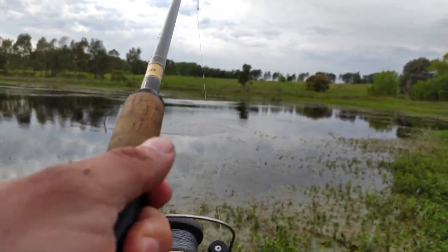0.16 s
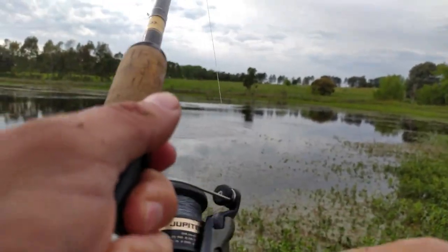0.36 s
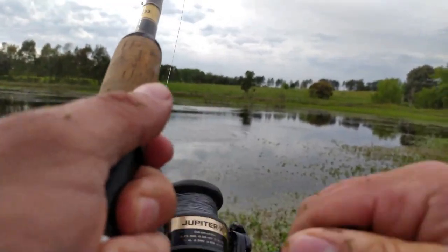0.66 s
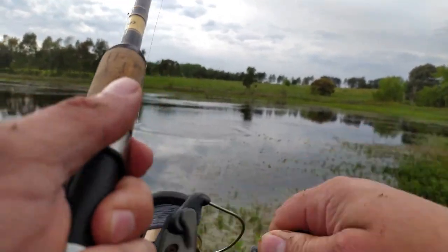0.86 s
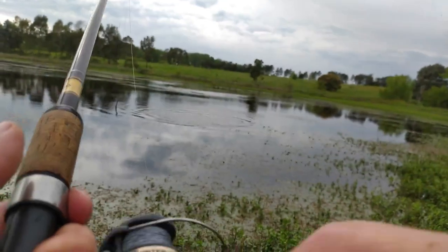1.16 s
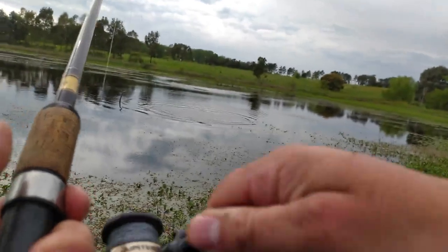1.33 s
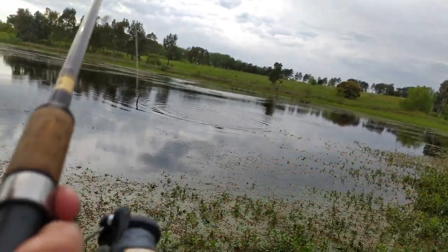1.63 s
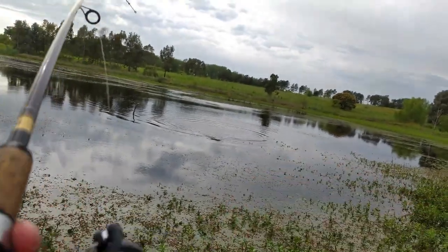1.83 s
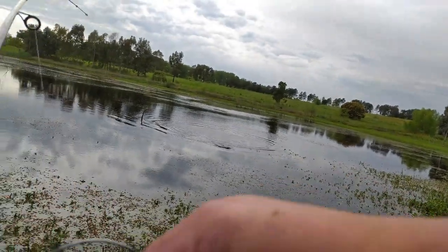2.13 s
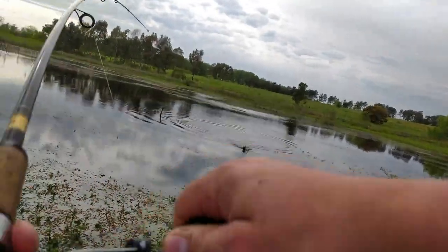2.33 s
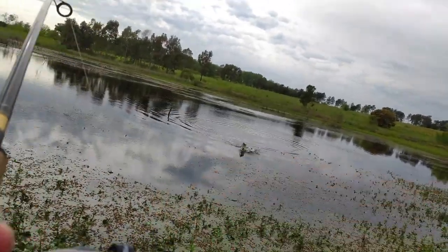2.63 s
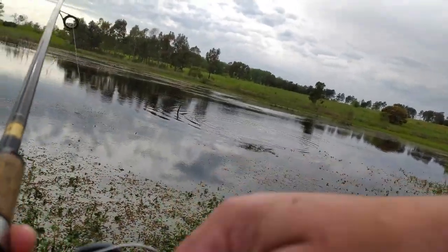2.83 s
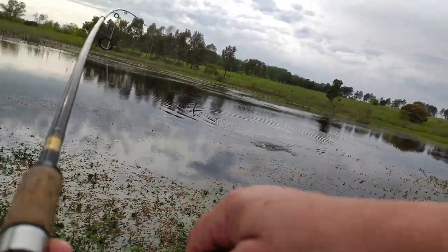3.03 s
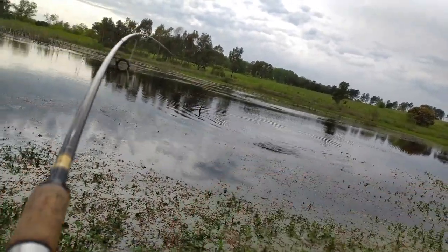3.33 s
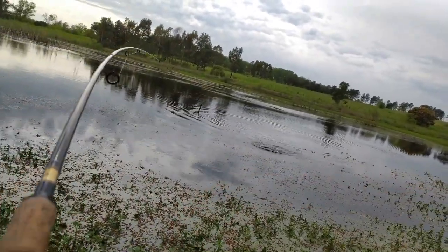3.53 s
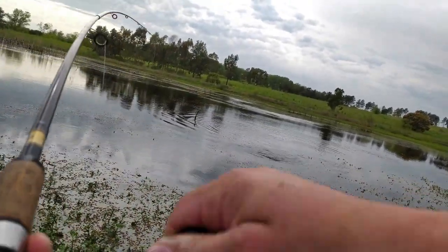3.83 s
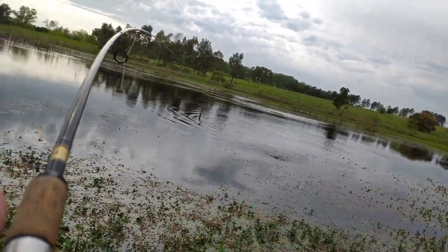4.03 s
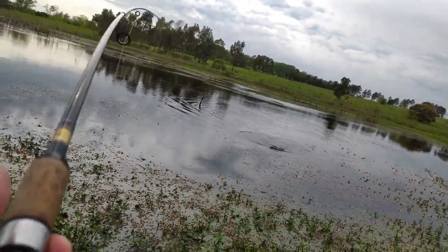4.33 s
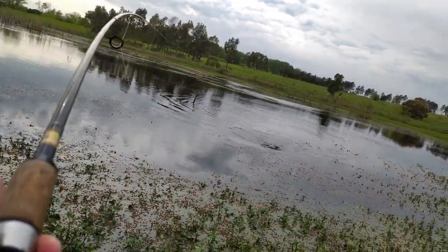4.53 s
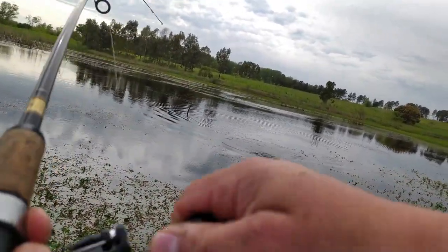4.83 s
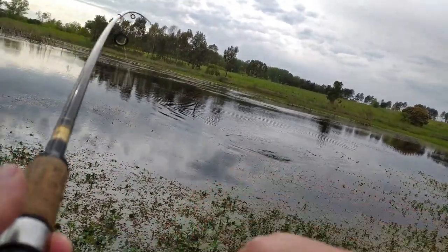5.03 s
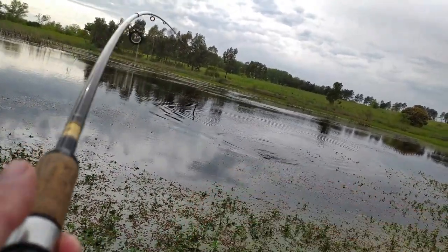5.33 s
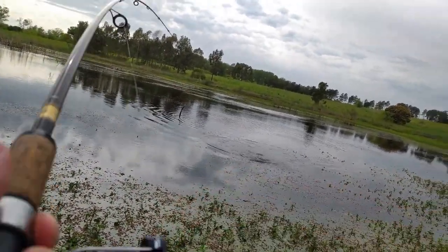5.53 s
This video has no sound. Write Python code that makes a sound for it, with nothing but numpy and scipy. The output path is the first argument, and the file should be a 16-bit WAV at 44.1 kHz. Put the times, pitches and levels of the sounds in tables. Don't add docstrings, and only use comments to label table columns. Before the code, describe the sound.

Very close to a stereo microphone beside a pond, a spinning reel starts with a short run of clicks, slows to sparse ticks, then is cranked in fast uneven bursts with a gritty rub and gear whirr. Low wind buffets thump on the left, strongest in the first second and a half, then fade. A few faint plops come from the water, over soft hiss.

```python
import sys
import numpy as np
from scipy import signal
from scipy.fft import rfft, irfft, next_fast_len
from scipy.io import wavfile
from scipy.ndimage import uniform_filter1d

SR = 44100
rng = np.random.default_rng(int(sys.argv[2]) if len(sys.argv) > 2 else 0)


def rack_gain(trim_db):
    fader = np.asarray(trim_db, float)
    return 10 ** (fader / 20)


def generate_wav(sig):
    pcm = np.round(np.clip(np.atleast_2d(sig).T, -1, 1) * 32767).astype(np.int16)
    wavfile.write(sys.argv[1], SR, pcm)


N = 250929
TIME = np.arange(N) / SR
PORT_LAG = 11


def rms_one(x):
    return x / np.sqrt(np.mean(x ** 2) + 1e-20)


def drift(rate):
    r = np.exp(-40 * np.pi * rate / SR)
    noise = rng.standard_normal(N // 20 + 4002)
    slow = signal.lfilter([1], [1, -2 * r, r * r], noise)[4000:]
    return np.interp(np.arange(N) / 20, np.arange(len(slow)), rms_one(slow))


def coloured(x, spectrum):
    hz, level_db = np.transpose(spectrum)
    size = next_fast_len(N)
    grid = np.log(np.arange(size // 2 + 1) * SR / size + 1)
    shape_db = np.interp(grid, np.log(hz), level_db)
    return rms_one(irfft(rfft(x, size) * rack_gain(shape_db), size)[..., :N])


def band(x, order, low_hz, high_hz):
    return signal.sosfilt(signal.butter(order, [low_hz, high_hz], "band", fs=SR, output="sos"), x)


def ring(x, hz, r):
    w = 2 * np.pi * hz / SR
    return signal.lfilter([0, np.sin(w)], [1, -2 * r * np.cos(w), r * r], x + 1e-18)


def at_ports(shared, own, alike):
    alike = np.clip(alike, 0, 1)
    common = np.array([np.roll(shared, PORT_LAG), shared])
    return np.sqrt(alike) * common + np.sqrt(1 - alike) * own


def lean(left_minus_right_db):
    return rack_gain(np.array([left_minus_right_db, -left_minus_right_db]) / 2)


# first tooth in seconds, number of teeth, first gap in ms, last gap in ms.
STROKES = [(0.0102, 7, 24.6, 36.6), (0.1746, 3, 53.9, 183.0), (0.428, 3, 478.0, 102.0),
           (0.7777, 18, 27.8, 15.5), (1.0449, 19, 17.0, 26.0), (1.3463, 16, 26.4, 22.7),
           (1.6197, 14, 27.0, 29.0), (1.9035, 4, 27.6, 54.3), (2.0342, 2, 115.7, 59.0),
           (2.2089, 11, 26.4, 14.6), (2.3945, 10, 11.6, 16.6), (2.549, 13, 31.4, 18.0),
           (2.765, 6, 30.8, 46.3), (2.9108, 3, 68.8, 18.8), (3.031, 13, 21.1, 19.2), (3.2319, 3, 5.8, 17.8),
           (3.3569, 6, 25.6, 15.3), (3.4567, 11, 12.6, 29.4), (3.6801, 3, 50.3, 24.3),
           (3.8071, 15, 23.6, 14.5), (4.0619, 3, 7.1, 107.2), (4.2267, 12, 22.4, 34.0),
           (4.4388, 3, 94.2, 44.3), (4.5871, 5, 25.8, 39.2), (4.7323, 7, 36.9, 18.2),
           (4.9118, 5, 15.7, 17.6), (5.0678, 8, 19.3, 16.3), (5.1863, 5, 16.0, 15.9),
           (5.3264, 8, 19.2, 21.0), (5.5113, 5, 16.9, 49.4)]
# snap in dB, lateness as a share of a gap, left minus right in dB.
WHEEL = [(-2.2, -0.013, -1), (-1.2, -0.062, 0), (0.5, -0.041, 0), (-0.6, 0.013, 4), (0.2, 0.015, 1),
         (2.8, 0.016, -3), (0.8, 0.011, 1.5), (-0.4, 0.012, -2), (-1.1, 0.032, 2), (-0.4, 0.017, 0)]


def teeth():
    start, count, first_ms, last_ms = np.transpose(STROKES)
    stroke = np.repeat(np.arange(len(start)), count.astype(int))
    u = np.concatenate([np.arange(n) / n for n in count])
    end = np.r_[start[1:], 5.7]
    ease = u * u * (3 - 2 * u)
    paces_ms = first_ms[stroke] * u * (1 - u) ** 2 - last_ms[stroke] * u * u * (1 - u)
    s = start[stroke] + (end - start)[stroke] * ease + count[stroke] * paces_ms / 1000
    late = np.resize(np.transpose(WHEEL)[1], len(s))
    return s + late * np.minimum(np.gradient(s), .03)


def speed_db(s, smooth_s):
    pace_db = 20 * np.log10(1 / 50 / np.diff(s))
    rate = np.interp(TIME, (s[1:] + s[:-1]) / 2, pace_db)
    return uniform_filter1d(rate, int(smooth_s * SR))


# pitch in Hz, level in dB, time to fall 60 dB in seconds.
PAWL = [(4900, -40, .004), (5105, -6, 0.0025), (5780, -0.5, 0.0019), (7290, -1.5, 0.0033),
        (8150, -1.5, 0.0036), (8950, -2, 0.0057), (9480, -1, 0.0038), (12000, -36, .003),
        (12400, -7, 0.001), (14300, -44, .003), (15300, -38, 0.0041)]


def pawl(s, peak_db, gain_db, chatter_s, catch_at, catch_spread_db, alike):
    luck = rng.standard_normal((len(s), 2))
    gap = np.diff(s, prepend=-.01)
    slow_loss_db = 10 * np.log10(np.maximum(gap * 50, 1))
    catch_db = -11 + catch_spread_db * np.minimum(luck[:, 1], 1) - slow_loss_db
    s = np.r_[s, s - gap * (catch_at + .07 * luck[:, 0])]
    peak_db = np.r_[peak_db, peak_db + catch_db] + gain_db

    tightness = rack_gain(1.8 * rng.standard_normal((len(s), 1)))
    spread = rng.standard_normal((len(s), 14)) * tightness
    at = np.clip(((s[:, None] + chatter_s * spread - .0003) * SR).astype(int), 0, N - 1)
    out = np.zeros((2, N))
    for hz, level_db, t60 in PAWL:
        clicks = np.zeros((3, N))
        dull_db = -24 * max(np.log2(hz / 7000), 0)
        colour_db = np.repeat([0., dull_db], len(s) // 2)
        colour_db += 4 * rng.standard_normal(len(s))
        height = rack_gain(peak_db + level_db + colour_db)[:, None]
        for part in clicks:
            sizes = rng.standard_normal(at.shape) * np.exp(-.75 * np.abs(spread))
            sizes = sizes / np.linalg.norm(sizes, axis=1, keepdims=True)
            np.add.at(part, at, sizes * height)
        out += ring(at_ports(clicks[0], clicks[1:], alike), hz, rack_gain(-60 / (t60 * SR)))
    return signal.sosfilt(signal.butter(4, 3900, "high", fs=SR, output="sos"), out)


def snaps(s, speed, load_db):
    tooth_db, _, facing_db = (np.resize(column, len(s)) for column in np.transpose(WHEEL))
    effort_db = (0.17 * speed + 0.33 * load_db)[(s * SR).astype(int)]
    snap_db = -20.5 + tooth_db + effort_db + 0.3 * rng.standard_normal(len(s))
    out = pawl(s, snap_db, gain_db=-1.5, chatter_s=.001, catch_at=0.34, catch_spread_db=4.0, alike=0.15)
    return out * lean(np.interp(TIME, s, facing_db))


# frequency in Hz, density in dB per Hz.
DRAG = [(1000, -13), (3600, -12), (4500, -5), (5500, -3), (6400, -6), (7700, 0), (9200, -1), (10400, -13),
        (11500, -17), (12600, -22), (14000, -24), (15500, -27)]


def drag(level_db, grain_db, flutter_db):
    burst_db = grain_db * np.minimum(rng.exponential(1, (3, N)), 4)
    grains = rng.standard_normal((3, N)) * rack_gain(burst_db)
    rub = at_ports(grains[0], grains[1:], alike=0.12) * rack_gain(flutter_db * drift(74.0))
    return rack_gain(level_db) * coloured(rub, DRAG)


# pitch in Hz, width in Hz, level in dB.
BODY = [(623, 27.4, 10.5), (1118, 34, 2), (1558, 71, 10), (2193, 640, 8), (2800, 260, 2), (3520, 57, 3)]


def whirr(level_db, flutter_db, broad_db):
    white = rng.standard_normal((3, N))
    mesh = at_ports(white[0], white[1:], alike=0.59)
    out = rack_gain(broad_db + 4.5 * drift(28.0)) * band(mesh, 2, 450, 4200)
    for hz, width, peak_db in BODY:
        swell = rack_gain(peak_db + flutter_db * (drift(20.0) + drift(78.0)))
        out += swell * ring(mesh, hz, np.exp(-np.pi * width / SR)) * width / SR * 52.0
    return rack_gain(level_db) * rms_one(out)


# time in seconds, load in dB, left minus right in dB.
CRANK = [(0, 1.5, -2), (.3, -1, 12), (.55, 0, -4), (.75, 0.5, 1), (.95, 3.5, 1), (1.2, -0.5, -1.5),
         (1.7, 1.5, -1.5), (1.95, -1, -4.5), (2.2, -1.5, -1), (2.39, 1.5, -3.5), (2.58, 1.5, -2),
         (2.9, -1, -1), (3.15, 1.5, 0), (3.7, -1.5, -4), (4.0, 1.5, -1), (4.55, -0.5, -2.5), (5.15, 1, 0),
         (5.69, -1.5, -8.5)]


def reel():
    at, *columns = np.transpose(CRANK)
    load_db, pan_db = (np.interp(TIME, at, column) for column in columns)
    s = teeth()
    speed = speed_db(s, smooth_s=0.0094)
    ratchet = snaps(s, speed, load_db)
    ratchet = ratchet + drag(load_db - 41.0 + 1.22 * speed, grain_db=5.5, flutter_db=3)
    gears = whirr(load_db - 44.5 + 1.07 * speed, flutter_db=2.3, broad_db=-4)
    return ratchet * lean(pan_db) + gears


# start in seconds, peak in dB, bubble pitch in Hz.
PLOPS = [
    (2.575, -41, 960),
    (4.485, -41, 700),
    (4.535, -47, 600),
    (4.582, -47, 650),
    (4.623, -44, 590),
    (4.727, -45, 460),
]


def plops(rise, last_s, splash_db):
    out, t = np.zeros(N), np.arange(SR // 25) / SR
    swell = t / last_s * np.exp(1 - t / last_s)
    splash = rms_one(band(rng.standard_normal((len(PLOPS), len(t))), 2, 550, 1300))
    for (s, peak_db, hz), spray in zip(PLOPS, splash):
        bubble = np.sin(2 * np.pi * hz * (t + rise * t ** 2 / 2))
        out[round(s * SR):][:len(t)] += rack_gain(peak_db) * (bubble + rack_gain(splash_db) * spray) * swell
    return np.array([np.roll(out, PORT_LAG // 2), out])


# start in seconds, hold in seconds, left in dB, right in dB.
GUSTS = [(0, 0.19, -14, -37), (0.124, 0.14, -18, -30.5), (0.294, 0.15, -17, -33.5), (0.549, .1, -18, -30),
         (0.744, 0.18, -28, -41), (0.955, 0.1, -22.5, -42), (1.183, 0.14, -22, -42),
         (1.44, 0.067, -27, -43), (1.613, 0.064, -37.5, -44.5), (1.762, 0.06, -29.5, -47),
         (1.892, 0.1, -35.5, -45.5), (2.088, .17, -40.5, -43.5), (2.602, 0.1, -25, -57),
         (2.809, 0.13, -27, -38), (3.265, 0.033, -29, -61), (3.403, 0.1, -27, -56),
         (4.125, 0.21, -43.5, -45), (4.426, 0.067, -50, -46), (4.733, 0.031, -55, -42.5),
         (5.074, 0.19, -58, -42), (5.353, 0.034, -33, -55), (5.607, 0.084, -42, -49)]


def gust_db():
    rise_db_per_s, fall_db_per_s, calm_db = 384, 177, -53
    out = np.full((2, N), float(calm_db))
    for s, hold_s, *peak_db in GUSTS:
        before = rise_db_per_s * np.maximum(s - TIME, 0)
        after = fall_db_per_s * np.maximum(TIME - s - hold_s, 0)
        out = np.maximum(out, np.array(peak_db)[:, None] - (before + after))
    return out


# frequency in Hz, density in dB per Hz.
BREEZE = [(15, -1), (40, 5), (90, -0.5), (165, -1.5), (300, -16), (500, -23), (900, -36), (2000, -60),
          (5000, -105)]


def breeze(level_db, lumps_db):
    rumble = coloured(rng.standard_normal(N), BREEZE)
    return rack_gain(level_db) * rms_one(rumble * rack_gain(lumps_db * drift(6.1)))


def lesser_eddies(level_db, hard):
    gap_s = .04
    s = np.arange(gap_s, N / SR - gap_s, gap_s)
    luck = rng.standard_normal((len(s), 3))
    s = s + gap_s * np.clip(luck[:, 0] / 4, -.5, .5)
    peak_db = level_db[(s * SR).astype(int)] - 0.5 + 2.5 * luck[:, 1]
    edge_db = -21.5 + 7.5 * luck[:, 2]
    rows = np.c_[s, peak_db, edge_db]
    clear = np.abs(s[:, None] - np.transpose(hard)[0]).min(axis=1) > gap_s / 2
    return list(hard) + list(rows[clear])


def eddies(table, start_hz, end_hz, fall_s, last_s, wobble_db, edge_hz, edge_s):
    out, t = np.zeros(N + SR), np.arange(SR // 8) / SR
    unsteady, uneven = drift(60.8), drift(40.0)
    rough = rms_one(band(rng.standard_normal(N), 3, edge_hz, 4.39 * edge_hz))
    slowing = end_hz + (start_hz - end_hz) * np.exp(-t / fall_s)
    swell = t / last_s * np.exp(1 - t / last_s)
    late = np.maximum(t - last_s + edge_s, 0) / edge_s
    front = late * np.exp(1 - late)
    for (s, peak_db, edge_db), luck in zip(table, rng.standard_normal((len(table), 2))):
        i = max(round((s - last_s) * SR), 0)
        near = np.minimum(i + np.arange(len(t)), N - 1)
        hz = slowing * rack_gain(0.12 * (peak_db + 15.5) + 1.268 * luck[0] + wobble_db * unsteady[near])
        wobble = np.sin(2 * np.pi * np.cumsum(hz) / SR + 3 * luck[1])
        body = wobble * swell * rack_gain(1.24 * uneven[near])
        out[i:i + len(t)] += rack_gain(peak_db) * (body + rack_gain(edge_db - 5.0) * rough[near] * front)
    return out[:N]


# time in seconds, peak in dB, sharp edge in dB relative to the peak.
EDDIES_LEFT = [(0.015, -10, -8.5), (0.052, -10, -7.5), (0.073, -8.5, -3.5), (0.095, -14.5, 4),
               (0.144, -8.5, -2), (0.155, -9, -2.5), (0.195, -10, -1), (0.231, -10, -2), (0.287, -19, -0.5),
               (0.32, -5.5, -11.5), (0.344, -12, -0.5), (0.393, -13.5, -4), (.404, -15, 4),
               (0.429, -8, -2.5), (0.454, -9.5, -14), (0.586, -16.5, -42), (0.973, -14, -18),
               (0.995, -14, -29), (1.064, -14.5, -21), (1.084, -20, -5.5), (1.246, -16.5, -27),
               (2.609, -25.5, -1), (2.689, -23, -3), (2.866, -27, -4), (2.949, -26.5, -1),
               (3.264, -25, -18), (3.298, -28, -30), (3.46, -20.5, -13), (5.374, -15.5, -16)]
EDDIES_RIGHT = [(0.13, -23, -4), (0.255, -20.5, -17), (0.588, -22.5, -15), (0.663, -28.5, -23),
                (0.765, -34, -3), (2.697, -37, 15), (2.849, -36.5, 7), (2.907, -27.5, -27),
                (5.108, -35, -20), (5.208, -36, 0)]


def wind():
    ports = []
    for level_db, hard in zip(gust_db(), (EDDIES_LEFT, EDDIES_RIGHT)):
        rumble = breeze(level_db, lumps_db=2)
        bumps = eddies(lesser_eddies(level_db, hard), start_hz=397.3, end_hz=152.2, fall_s=0.01104,
                       last_s=0.00895, wobble_db=2.2, edge_hz=197, edge_s=.0025)
        ports.append(rumble + bumps)
    return np.array(ports)


# frequency in Hz, density in dB per Hz.
AIR = [(100, -45), (400, -12.5), (1000, -15), (3000, -21), (5500, -33), (6800, -11), (8800, -16),
       (10300, -36), (12000, -36), (15000, -62)]


def still_air(level_db):
    return rack_gain(level_db) * coloured(rng.standard_normal((2, N)), AIR)


def scene():
    return reel() + plops(rise=53.0, last_s=0.0029, splash_db=-5) + wind() + still_air(level_db=-51.5)


def low_pass(x):
    return signal.sosfilt(signal.butter(12, 16980, fs=SR, output="sos"), x)


def record(dry):
    rounded = 1.406 * np.tanh(dry / 1.335)
    cut = signal.cheby2(10, 45, 16700, fs=SR, output="sos")
    return low_pass(signal.sosfilt(cut, rounded))


dry = scene()
out = record(dry)
generate_wav(out)
```